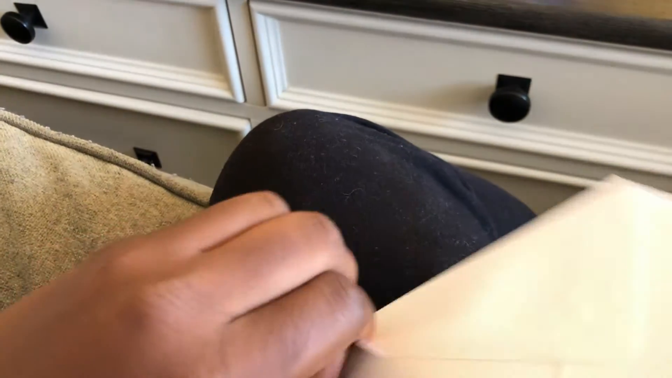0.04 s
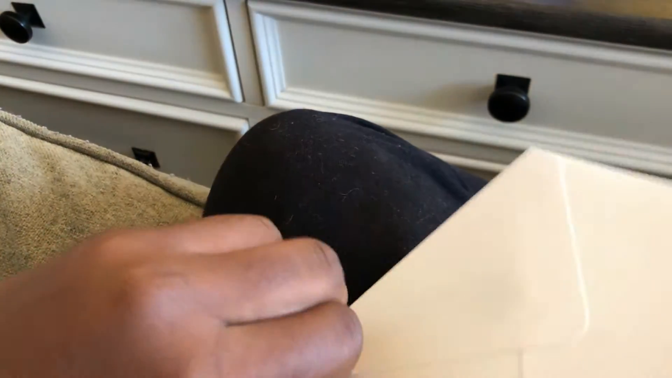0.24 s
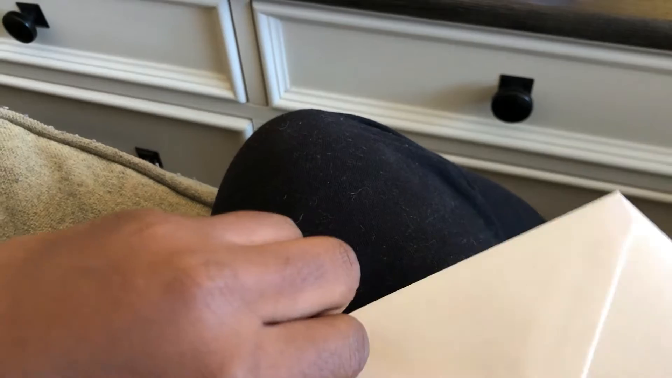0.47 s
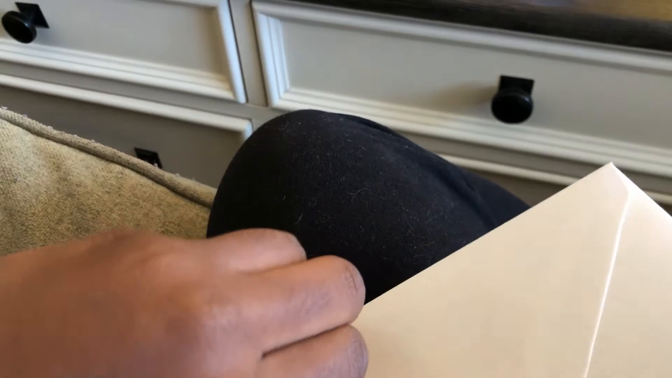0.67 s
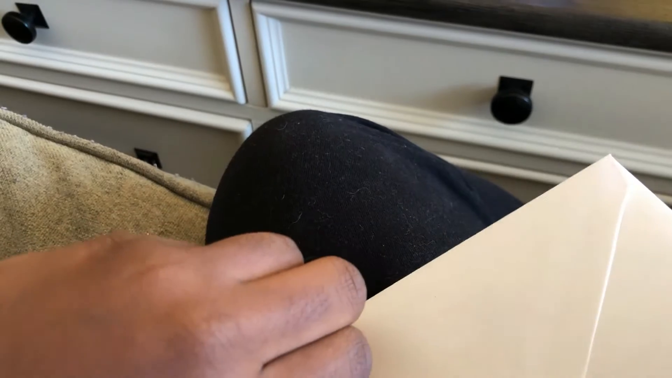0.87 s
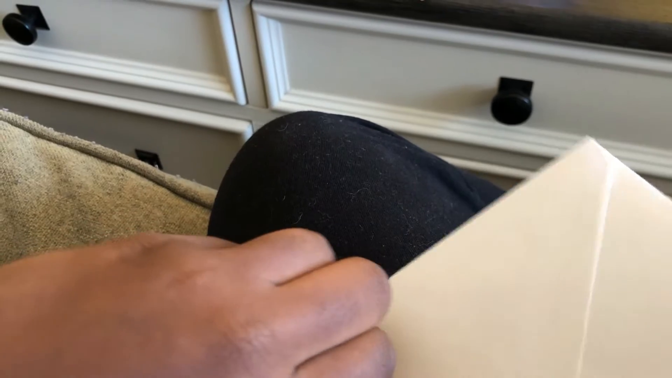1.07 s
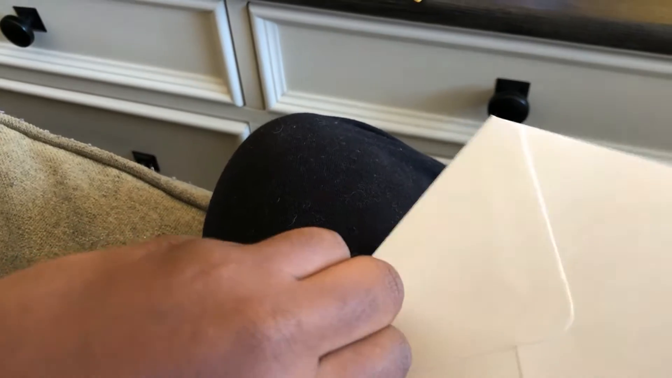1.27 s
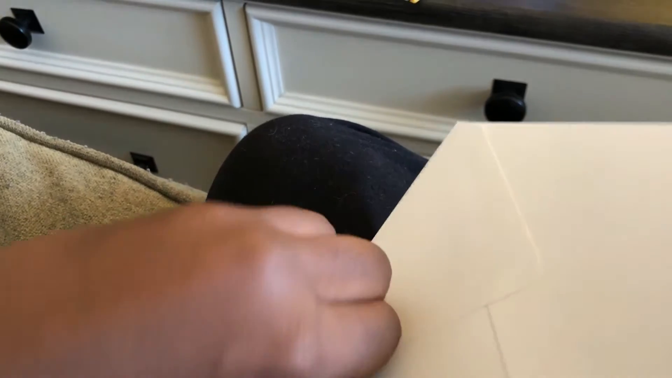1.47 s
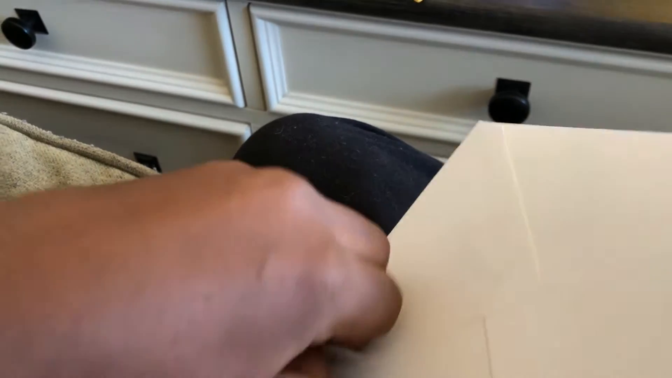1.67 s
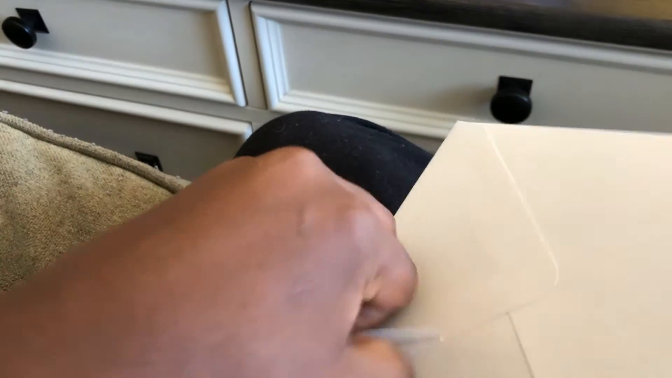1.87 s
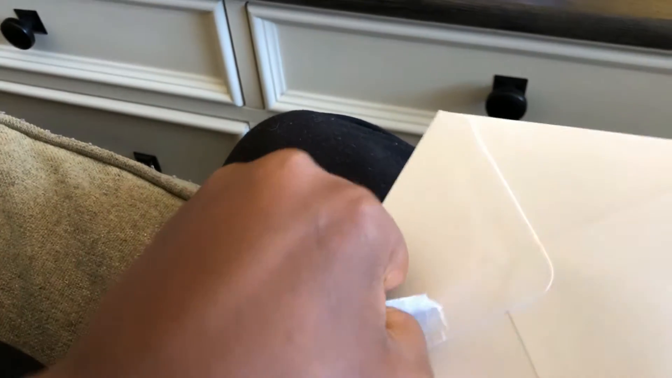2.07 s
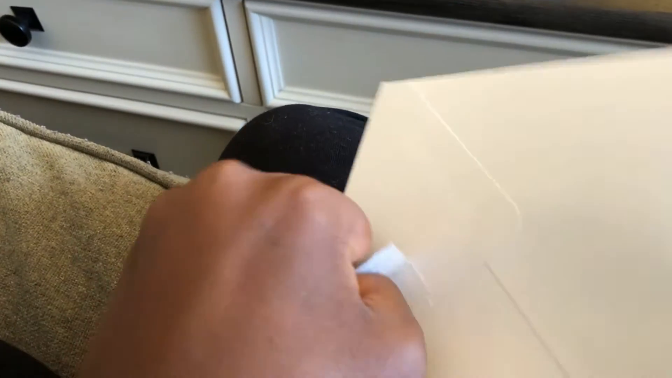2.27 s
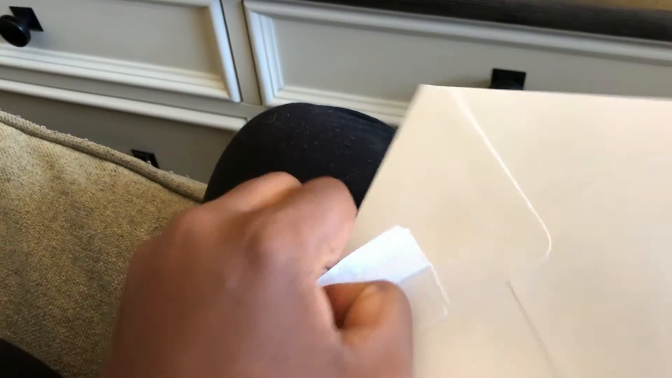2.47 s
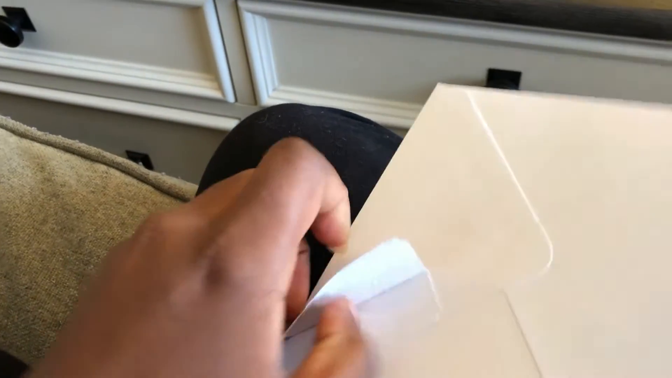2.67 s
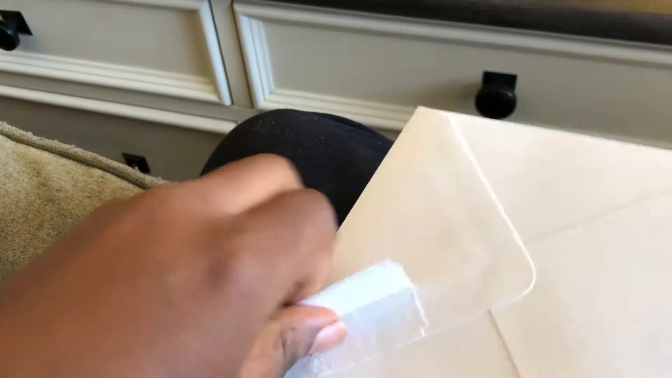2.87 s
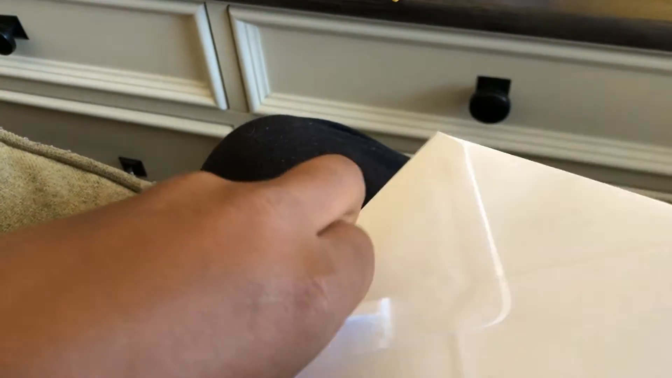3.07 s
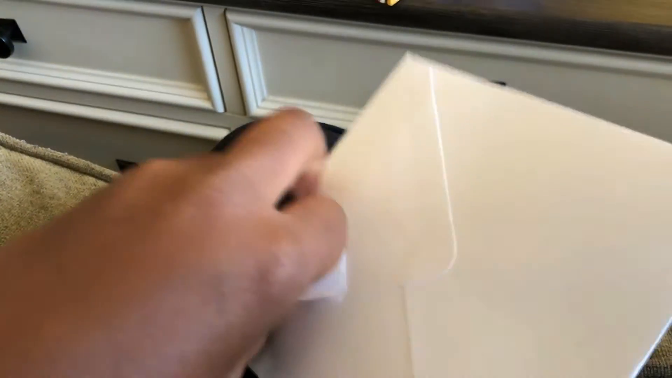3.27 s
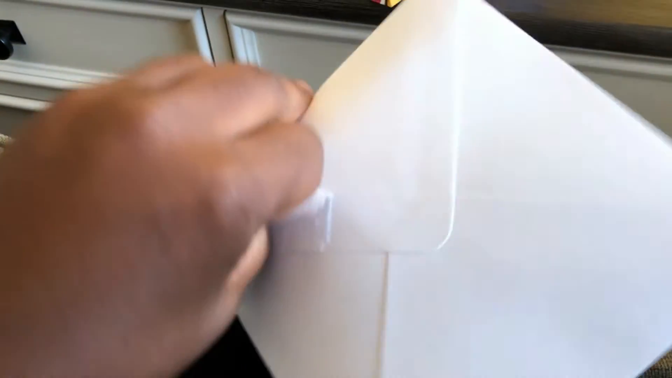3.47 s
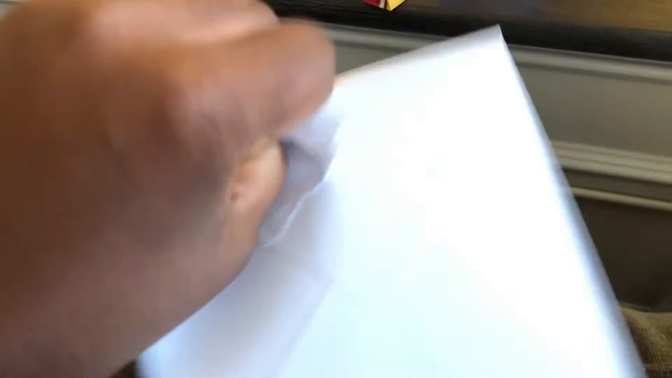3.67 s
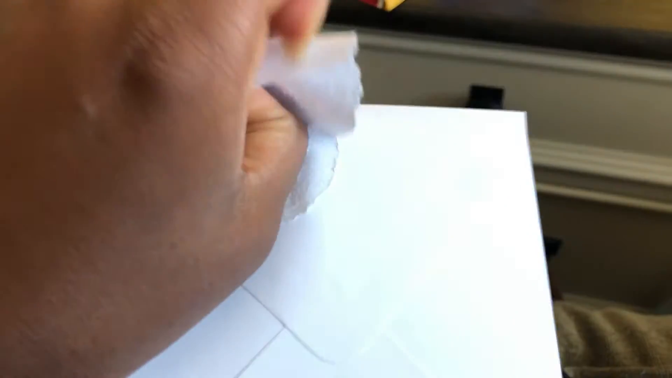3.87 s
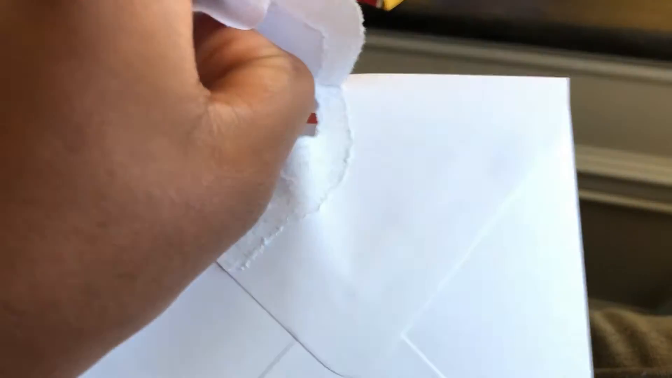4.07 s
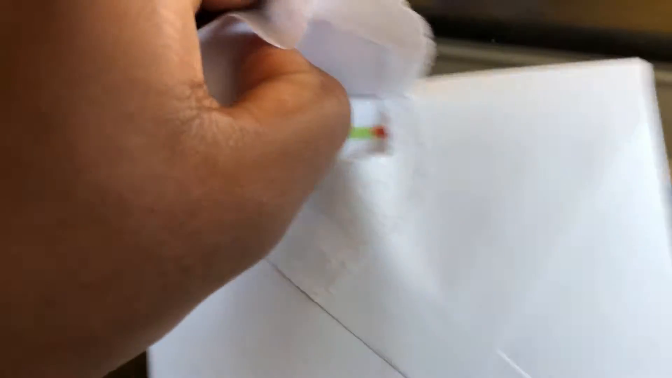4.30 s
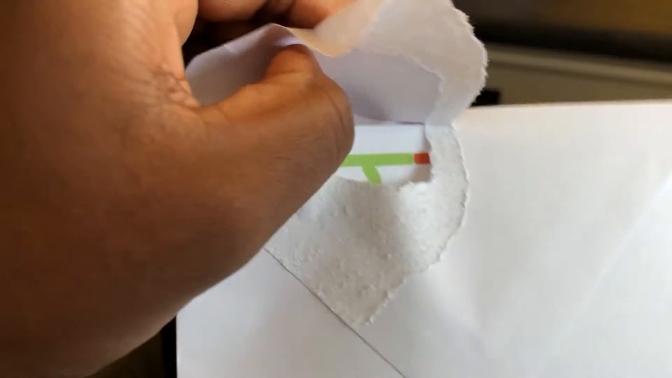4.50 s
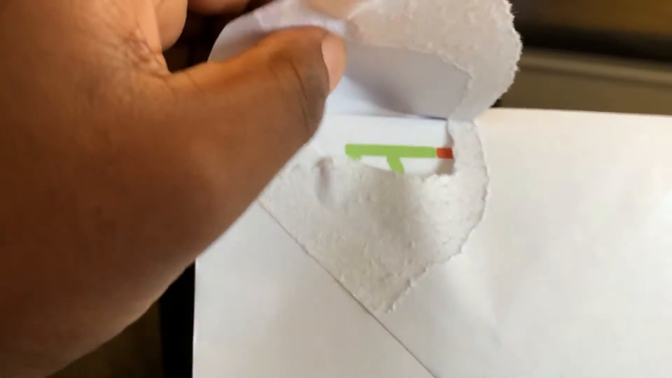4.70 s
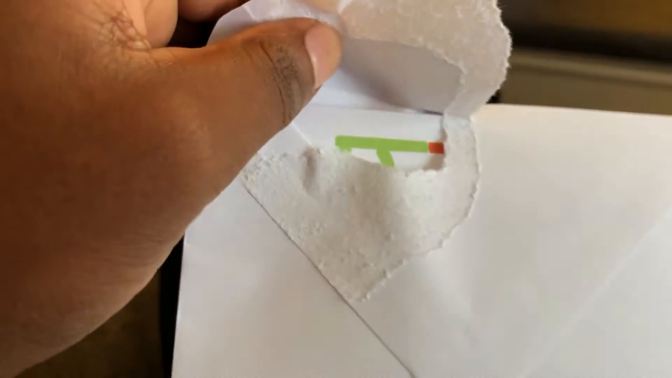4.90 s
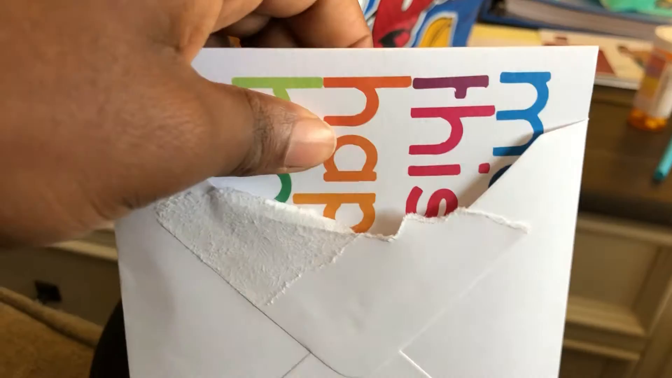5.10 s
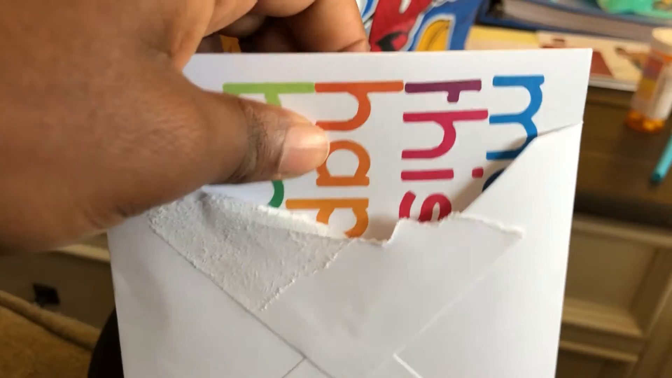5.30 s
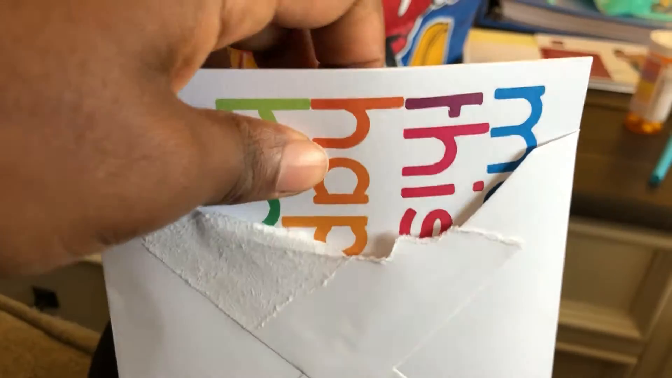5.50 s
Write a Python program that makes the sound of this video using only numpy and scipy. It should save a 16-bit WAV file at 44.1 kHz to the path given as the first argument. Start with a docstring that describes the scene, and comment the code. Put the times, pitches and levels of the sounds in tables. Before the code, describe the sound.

Close paper handling in a quiet room: light rubs, two crackly peels, one hard ragged rip, then a hollow papery slide and small crinkles.

```python
"""A small, quiet room: hands rub a paper envelope, peel and rip its flap open and slide the card inside.
Rubbing, sliding and tearing are dense runs of tiny slips and breaks, coloured and led by each gesture.
Creases and fibre bundles snap; each snap runs through the sheet as a bending wave, treble first.
The jerking sheet pushes soft puffs of air; a machine hums faintly over low room noise."""
import sys
import numpy as np
from scipy import signal
from scipy.fft import rfft, irfft, next_fast_len
from scipy.io import wavfile
from scipy.ndimage import uniform_filter1d

SR = 44100
rng = np.random.default_rng(int(sys.argv[2]) if len(sys.argv) > 2 else 0)


def unload_audio(sound):
    """Save the sound as a 16-bit wav file, at the path given as the first command line argument."""
    columns = np.transpose(np.atleast_2d(sound))
    # keep every value between -1 and 1, then stretch to whole-number steps
    steps = np.round(np.clip(columns, -1, 1) * 32767)
    wavfile.write(sys.argv[1], SR, steps.astype(np.int16))


N = 244691
TIME = np.arange(N) / SR
BINS = np.fft.rfftfreq(N, 1 / SR)

# finger strokes on the envelope: (start [s], length [s], peak pressure [dB], flexing [dB re pressure],
# crispness [dB re pressure], ring of the gripped patch [Hz])
RUBS = [(-0.1, 0.22, -43.5, -19, -7, 4950), (0.063, 0.25, -50.5, -16.5, -5, 5000),
        (0.259, 0.16, -58, -4, -4.5, 3630), (0.375, 0.19, -53, -12.5, -8.5, 3540),
        (0.543, 0.19, -63, -12, -10, 3200), (0.708, 0.17, -61.5, -4.5, -0.5, 6530),
        (0.945, 0.25, -61.5, -11, -14, 3340), (1.039, 0.023, -55.5, -22, -3, 4900),
        (1.147, 0.19, -53.5, -15, -3.5, 6300), (1.288, 0.13, -54, -22, 4, 6200),
        (1.386, 0.18, -52.5, -13.5, -4, 6250), (1.549, 0.17, -45.5, -16, -3.5, 5900),
        (1.677, 0.19, -51, -31, -2, 5770), (2.436, 0.35, -58.5, -9, -5, 3830),
        (2.631, 0.17, -43, -14, -9.5, 5800), (2.768, .12, -51, -7, -4, 5510),
        (2.867, 0.079, -48.5, -12.5, -2.5, 5630), (2.934, 0.26, -53.5, -7.5, -8, 5640),
        (5.432, 0.072, -46.5, -7, -12, 3950), (5.467, 0.22, -55.5, 3, -13, 3500)]
# flap peeling up in two pulls, one table a pull: (time [s], relative force [dB])
PEEL = [
    [(1.8, -46), (1.822, -45.5), (1.934, -37), (1.944, -40), (2.016, -26.5), (2.082, -38.5), (2.154, -33.5),
     (2.208, -36.5), (2.388, -39.5), (2.45, -61.5)],
    [(3.02, -49.5), (3.134, -41), (3.262, -46), (3.312, -37), (3.336, -40.5), (3.396, -30.5),
     (3.402, -39.5), (3.452, -44), (3.486, -34.5), (3.62, -45.5)],
]
# hard pull that rips the flap off: (time [s], relative force [dB])
RIP = [(3.618, -44.5), (3.665, -37.5), (3.715, -28), (3.757, -31), (3.781, -25), (3.82, -26.5),
       (3.835, -40), (3.862, -39.5), (3.912, -31), (3.94, -41), (3.985, -30.5), (4.018, -32.5), (4.05, -43),
       (4.12, -56.5)]


def amp(db):
    """Decibels to gain."""
    return 10 ** (np.asarray(db) / 20)


def unit(x):
    """Scales to rms 1."""
    return x / np.sqrt(np.mean(x ** 2) + 1e-20)


def colour(points, hz):
    """Gain of a (frequency [Hz], level [dB]) table at given frequencies, interpolated over log frequency."""
    table_hz, table_db = np.transpose(points)
    return amp(np.interp(np.log(hz + 1), np.log(table_hz + 1), table_db))


def add(mix, start_s, sound):
    """Mixes a sound in at a time."""
    part = mix[max(round(start_s * SR), 0):][:len(sound)]
    part += sound[:len(part)]


def during(start_s, end_s):
    """Sample times of one gesture."""
    return TIME[(TIME >= start_s) & (TIME < end_s)]


def follow(rows):
    """Sample times of a curve, then each of its columns at those times."""
    row_s, *columns = np.transpose(rows)
    t = during(row_s[0], row_s[-1])
    return t, *(np.interp(t, row_s, column) for column in columns)


def background():
    """Low room noise and a hum in which two close tones beat."""
    # steady room noise: (frequency [Hz], relative density [dB per Hz])
    floor = [(15, -39), (25, -14.5), (70, 0.5), (120, -1.5), (166, -6.5), (285, -5), (350, -14.5),
             (575, -24.5), (1100, -28.5), (2400, -30), (3500, -33.5), (6000, -36), (11600, -38),
             (16000, -56)]
    # motor and mains tones, the first before its swell: (frequency [Hz], level [dB rms])
    hum = [(58.4, -56), (115.3, -66.5), (119.8, -60.5), (289.2, -67.5)]
    # swell of the motor's lowest tone: (time [s], gain [dB])
    drone = [(0, -5.5), (0.9, 2.5), (1.4, -7), (2.2, 1), (2.8, 0), (3.4, 6), (4.2, 3), (4.9, 5.5),
             (5.55, 2)]
    floor_db = -56.5  # rms

    noise = irfft(rfft(rng.standard_normal(N)) * colour(floor, BINS), N)
    tones = [amp(db) * np.sqrt(2) * np.sin(2 * np.pi * (hz * TIME + rng.random())) for hz, db in hum]
    swell = amp(np.interp(TIME, *np.transpose(drone)))
    return amp(floor_db) * unit(noise) + tones[0] * swell + sum(tones[1:])


def puffs(width_share=0.44):
    """Soft, low pushes of air from the jerking sheet: narrow noise in bell-shaped bursts."""
    # jerks of the whole sheet: (time [s], peak level [dB], pitch [Hz], half length to 1/e [s])
    jerks = [(2.01, -52, 272, 0.044), (3.427, -52.5, 243, 0.029), (3.511, -44, 513, 0.0053),
             (3.643, -34, 614, 0.0042), (4.006, -40.5, 224, 0.016), (4.064, -41.5, 454, 0.013)]
    out = np.zeros(N)
    for peak_s, db, hz, half_s in jerks:
        band = np.exp(-((BINS / hz - 1) / width_share) ** 2 / 2)
        air = irfft(rfft(rng.standard_normal(N)) * band, N)
        out += amp(db) * unit(air) * np.exp(-((TIME - peak_s) / half_s) ** 2)
    return out


def sheet(hz, travel_s, echo, ring_s):
    """Path through paper: bending waves slow down toward the bass, then return from folds and edges."""
    lag = 4 * np.pi * np.sqrt(1e3 * hz)  # phase per second of travel at 1 kHz
    paths_s = rng.uniform(0.2894, 4, size=8) * ring_s
    returns = echo * rng.choice([-1, 1], size=8) * np.exp(-paths_s / ring_s / 2)
    echoes = returns @ np.exp(-1j * np.outer(paths_s, lag / 2 + 2 * np.pi * hz))
    return np.exp(-1j * lag * travel_s) * (1 + echoes)


def grains(per_s, spread_db, hiss, variety_db, travel_s, ring_s, count=24):
    """Tiny slips and breaks of very uneven size at many spots of the sheet, each spot with its own tone."""
    sizes = amp(spread_db * np.minimum(rng.exponential(1, N), 3.5)) * (rng.random(N) < per_s / SR)
    sizes *= rng.choice([-1, 1], N)
    spot = rng.integers(0, count, N)
    hz = np.fft.rfftfreq(1024, 1 / SR)
    out = np.zeros(N)
    for k in range(count):
        tone = np.transpose([np.geomspace(500, 16000, 9), variety_db * rng.standard_normal(size=9)])
        path = sheet(hz, travel_s * rng.uniform(0.51, 1.992), 0.84, ring_s)
        click = irfft(colour(tone, hz) * path)
        out += signal.oaconvolve(sizes * (spot == k), unit(click))[:N]
    out = unit(out) + hiss * rng.standard_normal(N)
    # the hand feeds in energy steadily, so a big break is paid for by a lull around it (25 ms)
    return out / np.sqrt(uniform_filter1d(out ** 2, size=1100) + 1e-9)


def held(drive, grips, patchy_db, width_octaves=0.086):
    """The gripped patch lifts one band, and the finer modes of the sheet wander as it bends."""
    hz, t, spectrum = signal.stft(drive, SR, nperseg=512)
    grip_s, ring_hz, lift_db = np.transpose(grips)
    octaves_off = np.log2((hz[:, None] + 1) / ring_hz)
    lifts_db = lift_db / (1 + (octaves_off / width_octaves) ** 2)
    grip_db = np.array([np.interp(t, grip_s, band) for band in lifts_db])
    modes = uniform_filter1d(rng.standard_normal(spectrum.shape), size=3, axis=0)  # over frequency
    modes = unit(uniform_filter1d(modes, size=18, axis=1))  # over time
    return signal.istft(spectrum * amp(grip_db + patchy_db * modes), SR, nperseg=512)[1][:N]


def play(drive, gain, t, force_db, flex_db, crisp_db):
    """Colours a drive and lets one gesture lead it: flexing feeds the low register, crispness the top."""
    size = next_fast_len(len(t))
    hz = np.fft.rfftfreq(size, 1 / SR)
    spectrum = rfft(drive[round(t[0] * SR):], size) * np.interp(hz, BINS, gain)
    low = 1 / (1 + (hz / 2500) ** 8)
    high = 1 / (1 + (7000 / (hz + 1)) ** 8)
    flex, mid, crisp = (unit(irfft(spectrum * share, size)[:len(t)])
                        for share in (low, 1 - low - high, high))
    contact = np.clip(np.minimum(t - t[0], t[-1] - t) / .005, 0, 1)  # 5 ms ramps
    out = np.zeros(N)
    add(out, t[0], contact * amp(force_db) * (amp(flex_db) * flex + mid + amp(crisp_db) * crisp))
    return out


def arch_db(share):
    """Pressure through one stroke, one skewed arch against the share of its length that has passed."""
    skew, roundness = 0.91, 0.85
    return 20 * np.log10(abs(np.sin(np.pi * share ** skew)) ** roundness + 1e-6)


def rubbing():
    """Skin drags over the grain of the paper in very fine slips; each stroke swells and eases."""
    # spectrum of a stroke: (frequency [Hz], relative level [dB])
    rub_colour = [(300, -7), (600, -6.5), (1000, -10), (1500, -3), (2200, -6.5), (3300, -4), (6300, -2.5),
                  (8200, -5.5), (11300, -3), (13500, -10), (16000, -21)]
    lift_db = 7
    drive = grains(per_s=1500, spread_db=2.5, hiss=0.39, variety_db=6.0, travel_s=0.000714, ring_s=.0009)
    grips = [(start_s + length_s / 2, ring_hz, lift_db) for start_s, length_s, *_, ring_hz in RUBS]
    drive = held(drive, grips, patchy_db=2.3, width_octaves=0.1)
    gain = colour(rub_colour, BINS)
    out = np.zeros(N)
    for start_s, length_s, db, flex_db, crisp_db, _ in RUBS:
        t = during(start_s, start_s + length_s)
        out += play(drive, gain, t, db + arch_db((t - start_s) / length_s), flex_db, crisp_db)
    return out


def pocket():
    """The air between the sheets adds a few broad resonances."""
    # resonances of the envelope's pocket: (frequency [Hz], width [Hz], level relative to the plain sheet [dB])
    resonances = [(1600, 450, -8), (3200, 550, -6), (5750, 700, -13)]
    return 1 + sum(amp(db) / (1 + 2j * (BINS - hz) / width_hz) for hz, width_hz, db in resonances)


def sliding():
    """Paper glides over the card with a smooth, hollow hiss."""
    # slide: (time [s], pressure [dB], flexing [dB re pressure], crispness [dB re pressure])
    slide = [(4.11, -54.5, 4.5, -2), (4.24, -68, 1.5, -2), (4.35, -64, 8.5, -3), (4.43, -53.5, 3, -1.5),
             (4.49, -59, 0, -6), (4.86, -48.5, -0.5, -12.5), (4.95, -44, -7, -28), (5.01, -54, -3.5, -16),
             (5.035, -75, -10, -8), (5.2, -84, -12, -3)]
    # spectrum ahead of the pocket: (frequency [Hz], relative level [dB])
    slide_colour = [(260, -11), (500, -4), (950, -7), (1600, 3), (2300, -5.5), (3200, -4.5), (6300, -6),
                    (8200, -6.5), (12000, -9.5), (16000, -21)]
    # patch that rings as the card moves along: (time [s], ring [Hz], lift of that band [dB])
    grips = [(4.43, 4400, 9), (4.7, 1230, 6.5), (4.88, 3200, 5.5), (4.96, 5800, 10)]
    drive = grains(per_s=3400, spread_db=7.5, hiss=0.94, variety_db=1.0, travel_s=0.000685, ring_s=0.00087)
    drive = held(drive, grips, patchy_db=3, width_octaves=0.21)
    return play(drive, colour(slide_colour, BINS) * pocket(), *follow(slide))


def lurches(depth_db, rate_hz=90):
    """The uneven speed of the tear, as a gain."""
    shape = (BINS / rate_hz) * np.exp(-BINS / rate_hz)
    speed = irfft(rfft(rng.standard_normal(N)) * shape, N)
    return unit(amp(depth_db * np.clip(unit(speed), -2, 2)))


def flap(pull, ring_hz, count=8):
    """The loose flap grows during a pull, so its ring sinks; rows (time [s], ring [Hz], lift [dB])."""
    sink_octaves_per_s, lift_db = 1.6, 1.5
    start_s, end_s = pull[0][0], pull[-1][0]
    return [(s, ring_hz * 2 ** (-sink_octaves_per_s * (s - start_s)), lift_db)
            for s in np.linspace(start_s, end_s, count, endpoint=False)]


def tear(drive, gain, pull, level_db, flex_db, flex_db_per_s, crisp_db, crisp_db_per_s):
    """One pull: force sets the level, and the sheet flexes more as more of it comes free."""
    t, force_db = follow(pull)
    age_s = t - t[0]
    return play(drive, gain, t, force_db + level_db,
                flex_db + flex_db_per_s * age_s, crisp_db + crisp_db_per_s * age_s)


def tearing():
    """Fibres break in a ragged run along the flap, which catches and lurches on."""
    # spectrum of the peel: (frequency [Hz], relative level [dB])
    peel_colour = [(100, -28), (450, -8), (800, -13.5), (1100, -10.5), (1550, -0.5), (2600, -0.5),
                   (4500, -1.5), (6500, 2), (9500, 8), (13000, 4.5), (16000, -11)]
    # spectrum of the rip: (frequency [Hz], relative level [dB])
    rip_colour = [(80, -22), (170, -13), (450, -9.5), (750, -10.5), (1050, -14.5), (1750, -0.5),
                  (2700, -2.5), (5000, 0.5), (6500, -1), (8500, -7.5), (10500, -5.5), (13000, -11.5),
                  (16000, -27)]
    peel_ring_hz, rip_ring_hz = 6500, 3200  # at the start of a pull
    first, second = PEEL
    drive = grains(per_s=900, spread_db=0.5, hiss=.15, variety_db=5.0, travel_s=0.001125, ring_s=.001)
    grips = flap(first, peel_ring_hz) + flap(second, peel_ring_hz) + flap(RIP, rip_ring_hz)
    drive = held(drive, grips, patchy_db=1.7) * lurches(depth_db=1.5)
    peel, rip = colour(peel_colour, BINS), colour(rip_colour, BINS)
    return (tear(drive, peel, first, level_db=-3.0, flex_db=-14.5, flex_db_per_s=12.5,
                 crisp_db=-1, crisp_db_per_s=-23)
            + tear(drive, peel, second, level_db=-3.5, flex_db=-10.5, flex_db_per_s=15.5,
                   crisp_db=2.5, crisp_db_per_s=-17)
            + tear(drive, rip, RIP, level_db=-1.9, flex_db=-2.5, flex_db_per_s=11.5,
                   crisp_db=-4, crisp_db_per_s=14))


def snaps(rows, level_db=-1.42, sharpness=1.27, travel_s=0.001378, echo=0.71, ring_s=0.00097, scatter_db=-11):
    """Each snap rings its patch of paper for a few cycles; large, low patches send their wave farther."""
    scatter_t60_s = .02
    hz, t = np.fft.rfftfreq(2048, 1 / SR), np.arange(2048) / SR
    out = np.zeros(N)
    for snap_s, db, ring_hz, top_hz in rows:
        u = 1j * hz / ring_hz
        patch = u * np.sqrt(u) / (1 + u / sharpness + u * u)
        edge = signal.freqs(*signal.butter(6, 1, analog=True), hz / top_hz)[1]
        # the wave then scatters through the whole envelope
        scatter = rng.standard_normal(len(t)) * amp(-60 * t / scatter_t60_s) * (t > .0005)
        path = sheet(hz, travel_s * np.sqrt(1500 / ring_hz), echo, ring_s)
        path = path + amp(scatter_db) * rfft(scatter / np.linalg.norm(scatter))
        click = irfft(patch * edge * path)
        click *= np.sqrt(SR / 1e3 / np.sum(click ** 2))  # energy of rms 1 over 1 ms
        add(out, snap_s - .0004, amp(db + level_db) * click)
    return out


def crinkles(over_db=10, spread_db=6, flex_share=0.51, ring_share=0.717, top_hz=8000, count=5):
    """Every stroke sets off small creases at random, louder where the sheet flexes; rows as for snaps."""
    rows = []
    for start_s, length_s, db, flex_db, _, ring_hz in RUBS:
        for when, size, patch in rng.random((count, 3)):
            crease_s = start_s + when * length_s
            if crease_s > 0:
                crease_db = db + arch_db(when) + flex_share * flex_db + over_db + spread_db * size
                rows.append((crease_s, crease_db, ring_share * ring_hz * (.5 + patch), top_hz))
    return rows


def bundles(pull, over_db, spread_db, ring_hz, count, octaves=.8, top_hz=11000):
    """Thicker fibre bundles snap at random along a pull, a few of them loudly; rows as for snaps."""
    pull_s, force_db = np.transpose(pull)
    when, size, patch = rng.random((count, 3)).T
    snap_s = pull_s[0] + (pull_s[-1] - pull_s[0]) * (np.arange(count) + when) / count
    snap_db = np.interp(snap_s, pull_s, force_db) + over_db + spread_db * size ** 2
    patch_hz = ring_hz * 2 ** (octaves * (2 * patch - 1))
    return [(s, db, hz, top_hz) for s, db, hz in zip(snap_s, snap_db, patch_hz)]


def crackling():
    """Single snaps of creases and fibre bundles at set times, and many more at random between them."""
    # single snaps, loud and faint: (time [s], relative level [dB], ring of the patch of paper [Hz], top edge [Hz])
    distinct_snaps = [(0.0068, -30, 4550, 10900), (0.0529, -33.5, 3430, 6200), (0.0749, -33, 4530, 8200),
                      (0.0921, -36, 4530, 9000), (0.1809, -38.5, 1020, 13200), (0.3064, -31.5, 3600, 6200),
                      (0.3197, -33.5, 4200, 5600), (0.3688, -38.5, 2750, 6800), (0.3804, -40, 1650, 7400),
                      (0.4386, -27.5, 2700, 12100), (0.4606, -26, 3520, 7260), (0.4795, -25, 3300, 7900),
                      (0.6154, -36, 3170, 6840), (0.6684, -35, 2900, 6800), (0.6946, -39.5, 2750, 6200),
                      (0.757, -48, 700, 2000), (0.8652, -41.5, 2540, 6800), (0.9029, -40.5, 5220, 16000),
                      (1.0989, -38.5, 2350, 5100), (1.3012, -30.5, 6940, 10900), (1.4149, -29, 4600, 12000),
                      (1.4539, -35, 5200, 16000), (1.5174, -30.5, 7100, 12300), (1.5553, -33, 626, 1490),
                      (1.6047, -39, 755, 16000), (1.8626, -25, 4530, 14500), (1.9299, -19, 7110, 10200),
                      (2.0213, -17.5, 2580, 12000), (2.0875, -25, 3150, 4600), (2.1237, -26.5, 4240, 5600),
                      (2.1301, -25, 1930, 12000), (2.1428, -19.5, 3000, 9900), (2.2355, -24.5, 2400, 11000),
                      (2.3063, -24.5, 3450, 9900), (2.3575, -24, 4280, 5600), (2.3741, -29, 2960, 9900),
                      (2.3262, -24, 3130, 10900), (2.3819, -22, 2660, 11000), (2.4121, -30, 2940, 10900),
                      (2.5152, -42.5, 2750, 3800), (2.7945, -34, 2340, 6800), (3.0937, -31, 1790, 6800),
                      (3.1405, -26, 6500, 8100), (3.2069, -26, 3500, 13200), (3.2851, -25, 7040, 9200),
                      (3.3079, -17.5, 6740, 10200), (3.316, -19, 7000, 10900), (3.3666, -19, 3100, 4540),
                      (3.3934, -16, 2660, 6000), (3.5059, -21, 1650, 9900), (3.5495, -25, 1966, 12000),
                      (3.6379, -20.5, 880, 4500), (3.7356, -15, 2190, 9900), (3.7799, -15, 2040, 16000),
                      (3.8135, -11.5, 4530, 16000), (3.8449, -18, 2000, 13200),
                      (3.8682, -17.5, 5610, 15800), (3.8872, -18, 8000, 16000), (3.9021, -33, 1730, 16000),
                      (3.9828, -23, 2200, 10000), (4.0113, -26, 1560, 9200), (4.0652, -18, 1850, 10000),
                      (4.0865, -27.5, 2120, 13300), (4.1271, -29.5, 2560, 9900), (4.1855, -27, 1870, 11900),
                      (4.2633, -25.5, 1280, 6200), (4.2791, -27.5, 1190, 5130), (4.2926, -34, 1340, 4200),
                      (4.3033, -33.5, 1270, 2100), (4.3422, -41, 1560, 2000), (4.3749, -35, 1480, 2110),
                      (4.7566, -32, 1144, 5100), (5.3189, -43, 1046, 6740), (5.358, -48.5, 1800, 7500),
                      (5.4186, -28.5, 3430, 16000), (5.4244, -25.5, 2450, 13200),
                      (5.4385, -29.5, 1650, 10900), (5.486, -35, 3960, 6700)]
    first, second = PEEL
    return snaps(distinct_snaps + crinkles()
                 + bundles(first, over_db=4, spread_db=5, ring_hz=3500, count=30)
                 + bundles(second, over_db=5, spread_db=5, ring_hz=6500, count=22)
                 + bundles(RIP, over_db=-2, spread_db=8, ring_hz=3300, count=24))


def room(x, wet_db=-17, t60_s=0.05):
    """A short, faint tail of sparse reflections from the furniture."""
    t = np.arange(SR // 2) / SR
    sparse = rng.standard_normal(len(t)) * (rng.random(len(t)) < .08)
    tail = sparse * amp(-60 * t / t60_s) * (t > .002)
    return x + amp(wet_db) * signal.oaconvolve(x, tail / np.linalg.norm(tail))[:N]


def scene():
    """All the paper sounds in the room, over its background."""
    paper = puffs() + rubbing() + sliding() + tearing() + crackling()
    return (room(paper) + background())[None]


def record(dry):
    """The level dips deeply for a moment and returns; then a low-pass limits the band."""
    dip_s, half_dip_s, edge_hz = 5.222, .045, 16200
    fade = np.sin(np.pi / 2 * np.clip(abs(TIME - dip_s) / half_dip_s, .12, 1)) ** 2
    lowpass = signal.firwin(255, edge_hz, window=("kaiser", 9), fs=SR)
    return signal.oaconvolve(dry * fade, lowpass[None], "same")


dry = scene()
out = record(dry)
unload_audio(out)
```